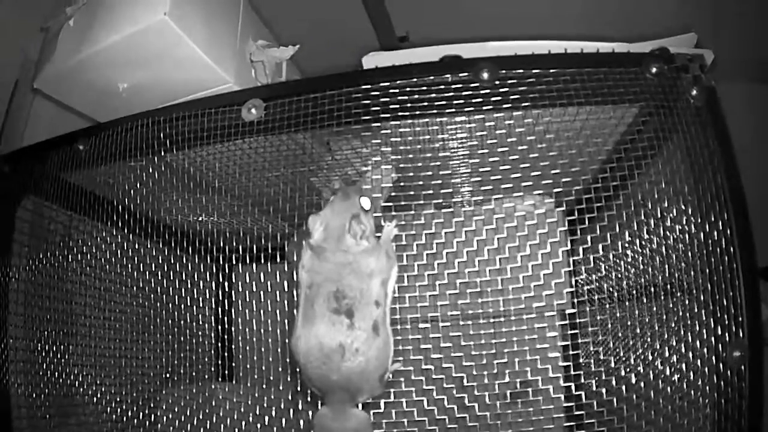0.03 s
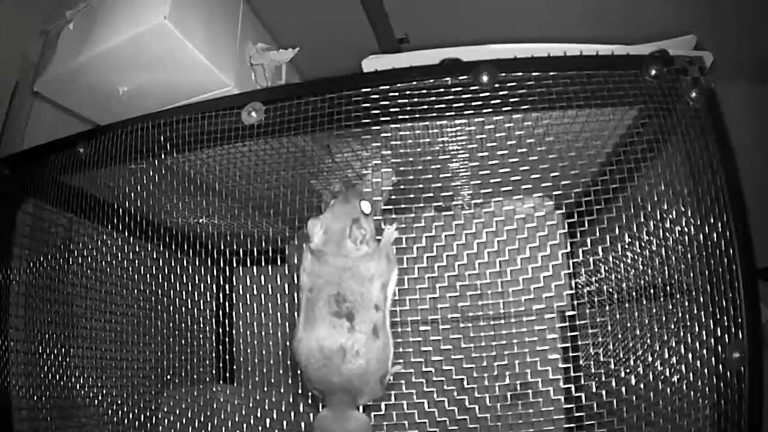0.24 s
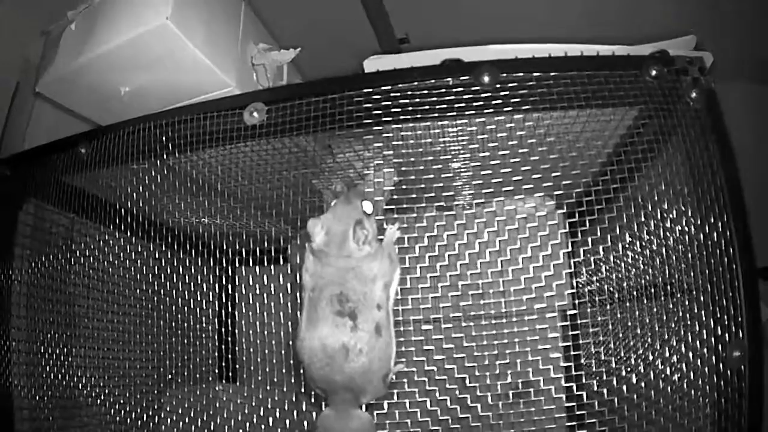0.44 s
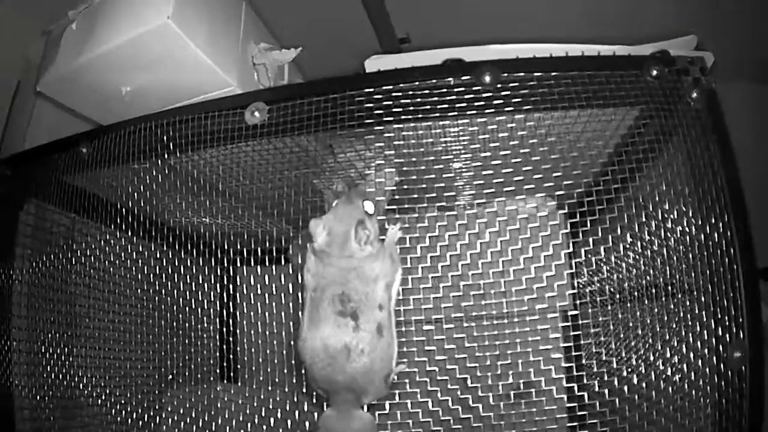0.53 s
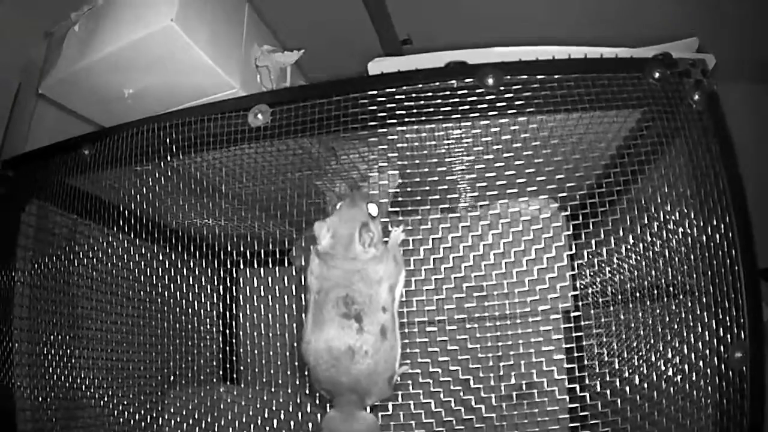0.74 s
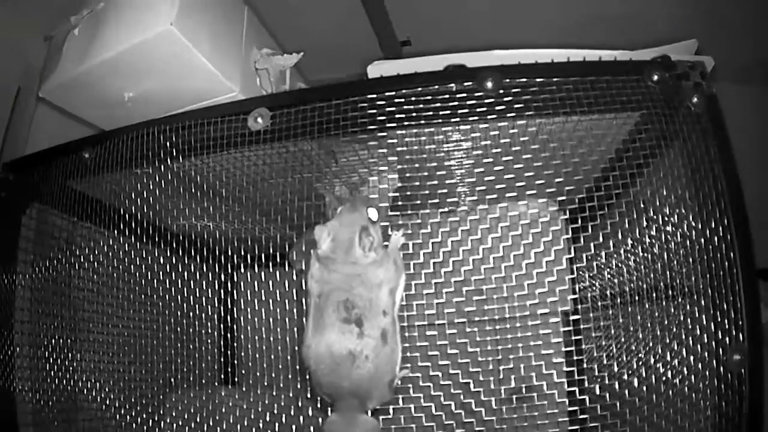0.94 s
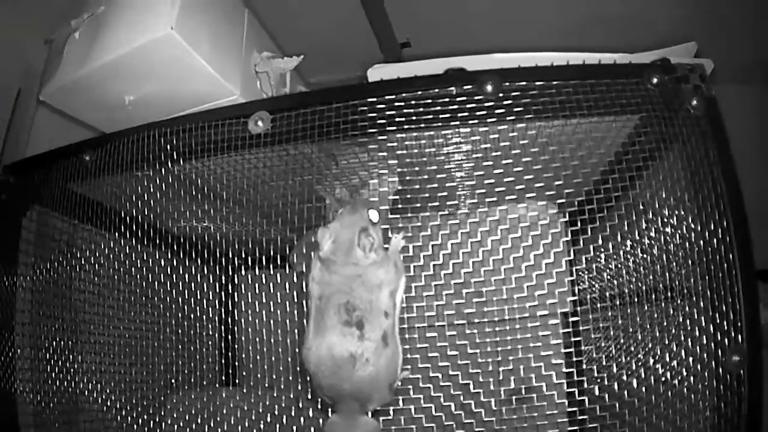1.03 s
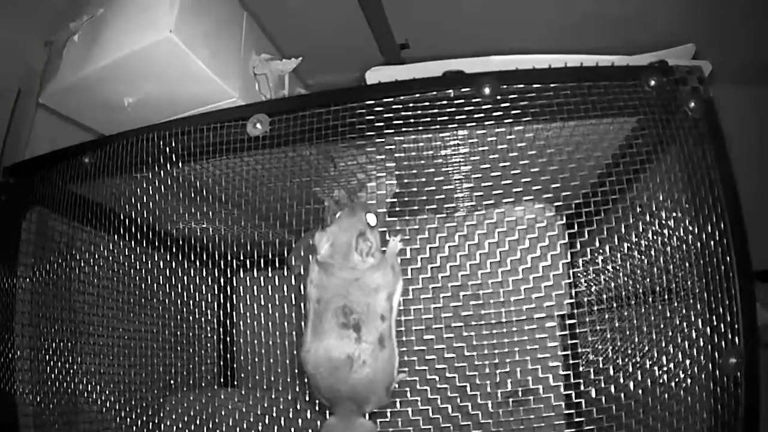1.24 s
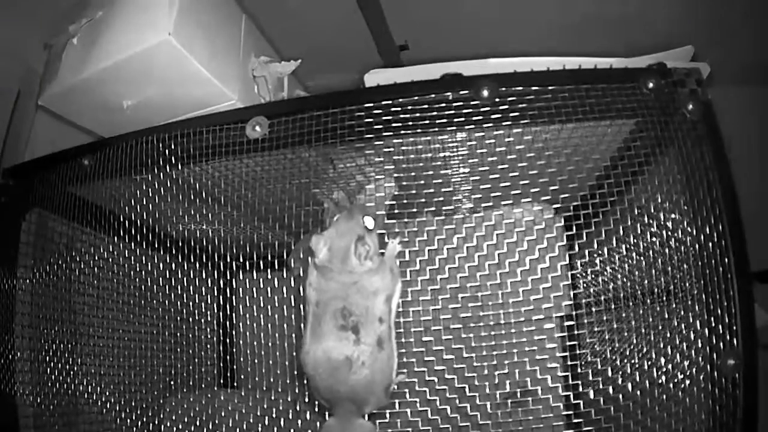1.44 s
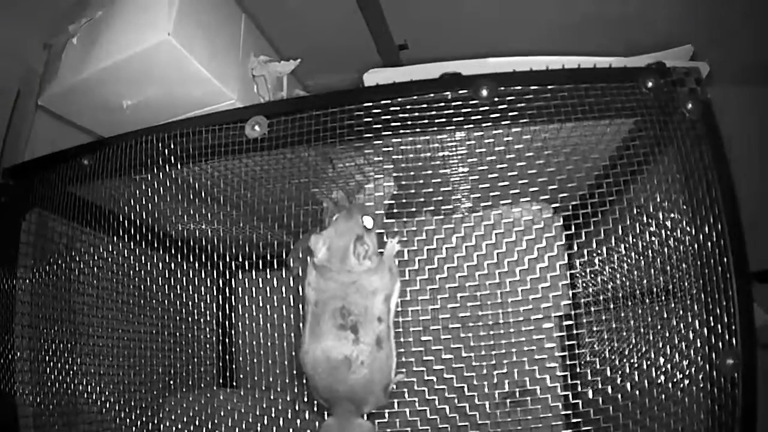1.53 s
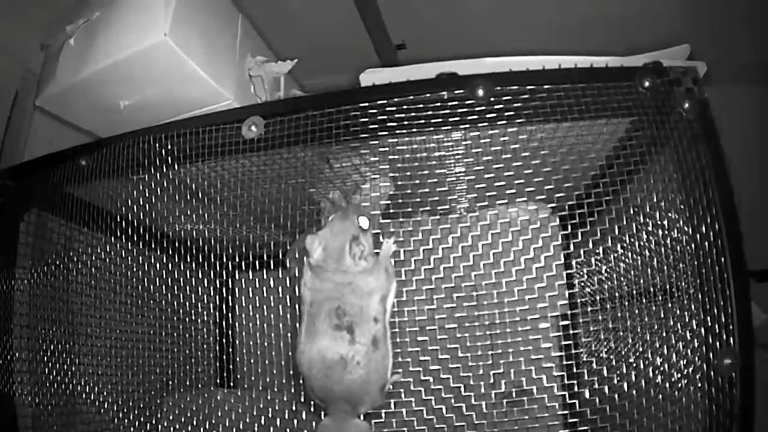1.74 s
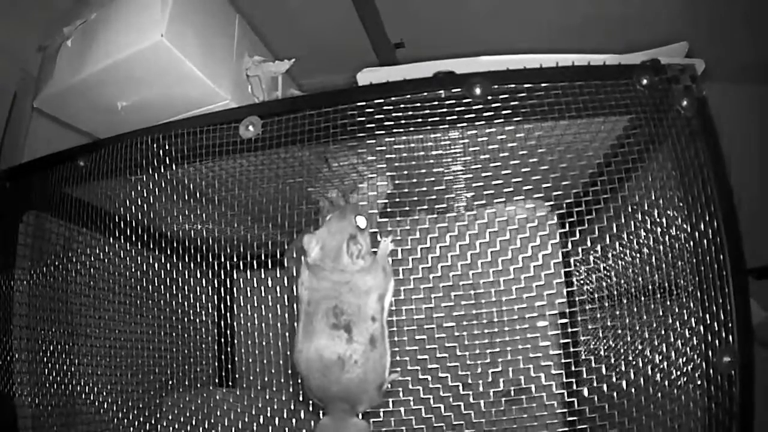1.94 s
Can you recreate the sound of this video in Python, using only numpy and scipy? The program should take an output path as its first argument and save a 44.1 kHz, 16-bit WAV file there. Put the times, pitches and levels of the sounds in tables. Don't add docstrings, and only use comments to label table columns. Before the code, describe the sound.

Two sharp, high rodent calls, each a breathy rasp snapping into a diving chirp, ring briefly in a small quiet room; fainter reverberant replies follow each, above steady hiss and rapid faint electronic ticking.

```python
import sys
import numpy as np
from scipy import signal
from scipy.fft import rfft, irfft
from scipy.io import wavfile
from scipy.ndimage import uniform_filter1d

SR = 44100
rng = np.random.default_rng(int(sys.argv[2]) if len(sys.argv) > 2 else 0)


def volts_from_db(level):
    exponent = np.asarray(level, float) / 20
    return 10 ** exponent


def unload_audio(sound):
    columns = np.transpose(np.atleast_2d(sound))
    steps = np.round(np.clip(columns, -1, 1) * 32767)
    wavfile.write(sys.argv[1], SR, steps.astype(np.int16))


N = 85995

# t/s, f/Hz, level/dB
RASP_LATE = [(1.205, 5530, -62), (1.22, 5050, -49), (1.23, 4763, -40), (1.242, 4694, -41),
             (1.252, 4694, -46), (1.266, 4690, -63.5)]
# f/Hz, level/dB
ROOM_COLOUR = [(1500, -19.5), (2200, -5), (3000, 10), (4400, -2), (5600, 12), (7300, 2.5), (8300, -12.5)]
CLOSURE_LATE_S = 1.237
WHINE_HZ = 2461


def rms_one(x):
    return x / np.sqrt(np.mean(x ** 2) + 1e-20)


def in_time(rows, shift=0):
    s, *columns = np.transpose(rows)
    t = np.arange(N) / SR - shift
    gate = uniform_filter1d(1. * (t > s[0]) * (t < s[-1]), size=40)
    return [np.interp(t, s, column) for column in columns], gate


def coloured(spectrum, count):
    hz, db = np.transpose(spectrum)
    f = np.maximum(np.fft.rfftfreq(count, 1 / SR), 1)
    level = np.interp(np.log(f), np.log(hz), db) - 60 * (f > 8000)
    return rms_one(irfft(rfft(rng.standard_normal(count)) * volts_from_db(level), count))


def drift(rate):
    r = np.exp(-2 * np.pi * rate / SR)
    noise = rng.standard_normal(N + SR)
    return rms_one(signal.lfilter([1], [1, -2 * r, r * r], noise)[SR:])


def tone(hz):
    return np.sqrt(2) * np.sin(2 * np.pi * np.cumsum(hz) / SR)


def window(start, length, edge):
    t = np.arange(N) / SR - start
    return np.clip(np.minimum(t, length - t) / edge, 0, 1)


def bell(centre, spread):
    u = (np.arange(N) / SR - centre) / spread
    return np.exp(-u ** 2 / 2) * (np.abs(u) < 3)


def buzz(rows, third_db):
    wobble = 1 + .03 * drift(150)
    upper = 1 + .05 * drift(200)
    out = 0
    for s, length, db, hz in rows:
        t = np.arange(N) / SR - s
        sag_db = 150 * np.abs(t)
        release_db = 2800 * np.maximum(t - length, 0)
        shape = np.clip(t / .002, 0, 1) * volts_from_db(db - sag_db - release_db)
        partials = tone(hz * wobble) + volts_from_db(-9.5) * tone(0.9 * hz * upper)
        partials = partials + volts_from_db(third_db) * tone(WHINE_HZ * upper) + volts_from_db(-17.5) * tone(3400 * wobble)
        out = out + shape * partials
    return out * volts_from_db(0.97 * drift(120))


def electronics():
    # t/s, length/s, level/dB, f/Hz
    buzzes = [(.049, 0.0096, -57, 762), (.116, 0.0079, -54.5, 808), (.178, 0.0086, -56, 778),
              (.249, 0.011, -56.5, 784), (.311, 0.0038, -54, 764), (.381, 0.0058, -52, 818),
              (.439, 0.0058, -52, 781), (.508, 0.0062, -51, 805), (.573, 0.0064, -52, 836),
              (.641, 0.004, -53, 769), (.649, 0.0048, -56, 792), (.703, 0.0066, -53, 843),
              (.713, 0.0068, -51.5, 830), (.775, 0.0088, -52.5, 824.5), (.785, 0.0033, -55, 803),
              (.84, 0.012, -52.5, 816), (.913, 0.0059, -52.5, 785), (.977, 0.014, -52, 815),
              (1.046, 0.026, -52, 827), (1.073, .024, -60, 680), (1.109, 0.0062, -52.5, 816.7),
              (1.18, 0.0054, -55.5, 845), (1.313, 0.013, -52.5, 814), (1.377, 0.011, -53.5, 792.6),
              (1.445, 0.0051, -55.5, 814), (1.506, .004, -55.5, 780), (1.513, 0.0084, -59.5, 767),
              (1.578, 0.0087, -53.5, 817), (1.644, 0.0053, -55, 793), (1.711, 0.0042, -52.5, 832),
              (1.717, 0.0093, -56, 760), (1.777, 0.0036, -52.5, 785), (1.785, 0.0037, -52.5, 790),
              (1.848, 0.0039, -49.5, 798), (1.91, 0.0099, -56.5, 760), (.831, .004, -67.5, 794),
              (1.21, .004, -60.5, 787), (1.333, .004, -57.5, 790), (1.594, 0.0035, -65.5, 790),
              (1.143, .003, -66, 780)]
    # t/s, length/s, level/dB, f/Hz
    ticks = [(.755, 0.0042, -60.5, 771), (.882, 0.0063, -61.5, 803), (.953, 0.0039, -56.5, 799),
             (1.239, 0.0037, -62, 807), (1.273, 0.0035, -61, 757), (.634, 0.0033, -58.5, 784),
             (1.475, .004, -61, 779)]
    # f/Hz, relative level/dB
    hiss = [(15, 7), (60, 0.5), (200, -14), (546, -18.5), (800, -20), (1310, -21), (3000, -22),
            (8300, -22.5)]
    frame_s, frame_start_s, gap_s = 1 / 15, -.004, .016
    resting = (np.arange(N) / SR - frame_start_s + gap_s / 2) % frame_s < gap_s
    whine = volts_from_db(-73.5 + 2.5 * drift(25)) * tone(WHINE_HZ * (1 + 0.00059 * drift(56)))
    whine = whine * uniform_filter1d(1. - resting, size=130)
    return buzz(buzzes, -10) + buzz(ticks, 0.5) + whine + volts_from_db(-58.5) * coloured(hiss, N)


def tail(x, t60, colour):
    t = np.arange(SR // 2) / SR
    onset = np.clip((t - .012) / .01 + 1, 0, 1)
    response = coloured(colour, len(t)) * volts_from_db(-60 * t / t60) * onset
    return signal.fftconvolve(x, response / np.sqrt(np.sum(response ** 2)))[:N]


def far_animal():
    # chirp t/s, chirp level/dB, rasp lead/s, rasp level/dB
    far_calls = [
        (.828, -32, 0.065, -22.5),
        (1.792, -33.5, 0.082, -23.5),
    ]
    # t/s, f/Hz, level/dB
    far_chirp = [(0, 7670, -25.5), (.005, 7945, -22), (.012, 7420, -18), (.0145, 4460, -11.5),
                 (.024, 3950, -11), (.03, 3700, -22)]
    # f/Hz, level/dB
    far_colour = [(1500, -16), (3300, 2.5), (4200, -6.5), (5200, 2.5), (7300, 5.5), (8300, -9)]
    # t/s, length/s, f/Hz, level/dB
    peep_rows = [(0.74, 0.047, 7470, -69), (0.85, 0.04, 4770, -68), (0.0215, 0.0062, 3880, -52.5),
                 (0.012, 0.0053, 2800, -72), (0.602, 0.031, 8400, -66), (1.565, 0.037, 7770, -67.5),
                 (1.8, 0.0178, 6300, -70.5)]
    calls = 0
    for s, db, lead, rasp_db in far_calls:
        rasp_shift = s - lead - RASP_LATE[1][0]
        calls = calls + volts_from_db(db) * chirp(far_chirp, s)
        calls = calls + volts_from_db(rasp_db) * rasp(RASP_LATE, rasp_shift, -16, CLOSURE_LATE_S)
    peeps = 0
    for s, length, hz, db in peep_rows:
        peeps = peeps + volts_from_db(db) * window(s, length, 1 / 300) * tone(hz * (1 + .012 * drift(250)))
    calls_heard = volts_from_db(-8) * calls + volts_from_db(-2) * tail(calls, 0.27, far_colour)
    return calls_heard + peeps + volts_from_db(0.5) * tail(peeps, 0.03, ROOM_COLOUR)


def cage(x):
    # delay t/s, level/dB
    echoes = [(.004, -6), (.0078, -12.5), (0.017, -14)]
    n = np.arange(N)
    return sum(volts_from_db(db) * np.interp(n - s * SR // 1, n, x) for s, db in echoes)


def throat_hiss(rows):
    # f/Hz, relative level/dB
    throat = [(1000, -50.5), (2150, -7.5), (2750, -18.5), (4000, -14.5), (6000, -8), (6650, 0),
              (6950, -7.5), (7400, -1), (8000, -4.5)]
    (db,), gate = in_time(rows)
    return gate * volts_from_db(db + 2.0 * drift(40)) * coloured(throat, N)


def snaps():
    # t/s, puff level/dB, ring f/Hz, ring level/dB
    pulses = [(.174, -46, 7300, -51), (0.1795, -42.5, 7700, -51.5), (.187, -53, 7600, -43),
              (.194, -51, 7900, -40), (.199, -45, 7950, -38), (0.2046, -44, 6780, -32.5),
              (0.2083, -43.5, 6100, -41.5), (1.222, -47.5, 7200, -56), (1.228, -52, 7500, -45),
              (1.2296, -51, 7400, -60), (1.241, -40.5, 7350, -39), (1.2482, -49, 7600, -45),
              (1.254, -44, 7500, -49), (1.262, -45.5, 7950, -38.5), (1.271, -59.5, 7800, -49),
              (1.2965, -55.5, 6500, -57)]
    air = coloured([(300, 1.0), (3000, -5.5), (6500, -3)], N)
    wobble = 1 + 0.014 * drift(300)
    out = 0
    for s, db, hz, ring_db in pulses:
        puff = volts_from_db(db - 5.5) * bell(s, .0012) * air
        ring = volts_from_db(ring_db) * bell(s, 0.0016) * tone(hz * wobble)
        out = out + puff + ring
    return out


def rasp(rows, shift, overtone_db, closure):
    (hz, db), gate = in_time(rows, shift)
    t = np.arange(N) / SR - shift - closure
    flutter = 1 - .8 * np.cos(np.pi * 98 * t) ** 2
    whistle = tone(hz * (1 + .014 * drift(300)))
    overtone = volts_from_db(overtone_db) * tone(7600 + 250 * drift(66))
    air = volts_from_db(-7) * coloured([(300, -19.5), (2000, -19), (5500, -12), (7500, -5.0)], N)
    return gate * volts_from_db(db) * flutter * (whistle + overtone + air)


def chirp(rows, shift=0):
    # f/Hz, level/dB
    port = [(1850, -20), (2170, -4), (2500, -16), (3100, -26), (4300, -6), (5600, -27), (6900, -4),
            (7400, 0)]
    (hz, db), gate = in_time(rows, shift)
    return gate * volts_from_db(db + np.interp(hz, *np.transpose(port))) * tone(hz)


def scene():
    # t/s, f/Hz, level/dB
    chirp_early = [(.2035, 7450, -30), (.208, 7770, -31), (.222, 7820, -28), (.229, 7900, -38),
                   (.2328, 7945, -19), (.2385, 7720, -21), (.245, 6750, -27), (.2492, 4700, -25),
                   (.2685, 1950, -43)]
    chirp_late = [(1.292, 7400, -54), (1.2965, 7600, -30), (1.2995, 7830, -34), (1.303, 7950, -19),
                  (1.308, 7550, -21), (1.3115, 6800, -26), (1.3145, 4750, -24), (1.322, 3750, -27),
                  (1.338, 1750, -31)]
    # t/s, f/Hz, level/dB
    rasp_early = [(.152, 5390, -60.5), (.16, 5220, -47.5), (.177, 4930, -44.5), (.185, 4820, -35),
                  (.196, 4680, -41.5), (.212, 4630, -51.5)]
    # t/s, level/dB
    effort_early = [(0, -78), (.012, -55.5), (.09, -58.5), (.15, -52), (.2, -52), (.225, -48), (.25, -62.5)]
    effort_late = [(1.045, -78.5), (1.058, -52.5), (1.12, -55), (1.2, -52.5), (1.24, -53.5), (1.262, -51.5),
                   (1.274, -56.5), (1.292, -62.5)]
    whistles = chirp(chirp_early) + chirp(chirp_late)
    rasps = rasp(rasp_early, 0, -16.5, .1915) + rasp(RASP_LATE, 0, -16.5, CLOSURE_LATE_S)
    room = volts_from_db(-5) * tail(whistles + volts_from_db(-12) * rasps, 0.15, ROOM_COLOUR)
    air = throat_hiss(effort_early) + throat_hiss(effort_late) + snaps()
    mono = whistles + rasps + cage(whistles) + room + air + far_animal() + electronics()
    return np.array([mono, mono])


def channel_difference(x):
    # t/s, spread/s, level under the sound/dB, lowest f/Hz
    moments = [
        (.175, .013, -24, 60),
        (.325, .02, -26, 60),
        (1.208, .012, -20, 60),
        (1.33, .015, -27, 60),
        (1.61, .009, -19, 4200),
    ]
    x = x + 3 * signal.sosfilt(signal.butter(2, 2000, fs=SR, output="sos"), x)
    blurred = signal.fftconvolve(x, rng.standard_normal(400) / 20)[200:N + 200]
    out = 0
    for s, spread, db, hz in moments:
        highpass = signal.butter(4, hz, "high", fs=SR, output="sos")
        out = out + volts_from_db(db) * bell(s, spread) * signal.sosfilt(highpass, blurred)
    return out


def top_cut(x):
    return signal.sosfilt(signal.butter(12, 9490, fs=SR, output="sos"), x)


def record(dry):
    mirror = dry * 2 * np.cos(2 * np.pi * 16000 * np.arange(N) / SR)
    above = np.clip((np.fft.rfftfreq(N, 1 / SR) - 7850) / 480, 0, 1)
    x = irfft(rfft(dry + mirror) * np.cos(np.pi / 2 * above) ** 2, N)
    x = x + channel_difference(x[0]) * [[1], [-1]]
    return top_cut(x)


dry = scene()
out = record(dry)
unload_audio(out)
```